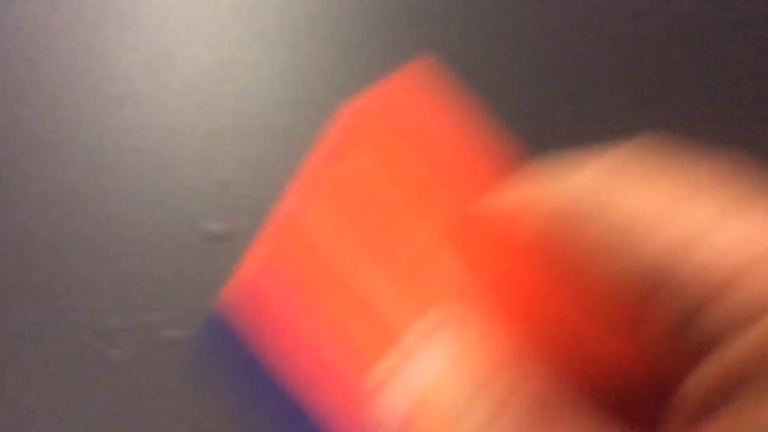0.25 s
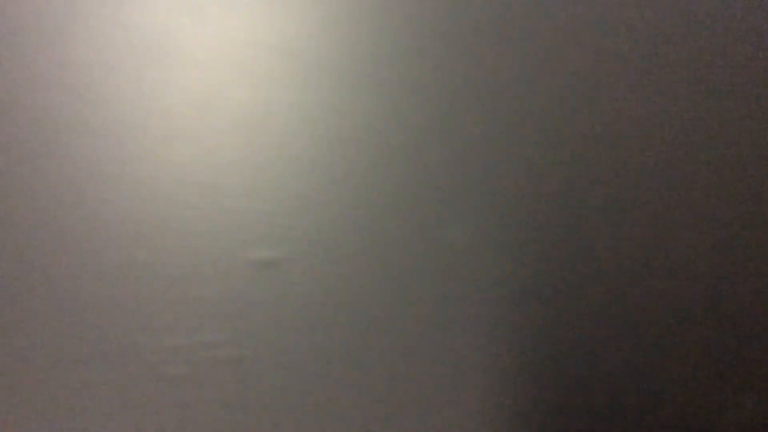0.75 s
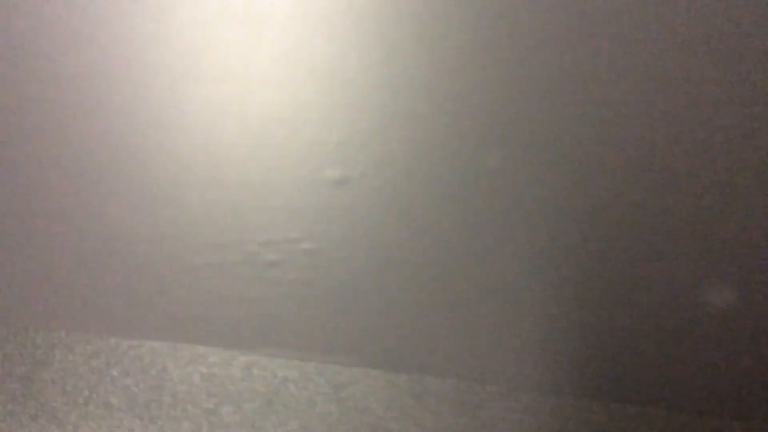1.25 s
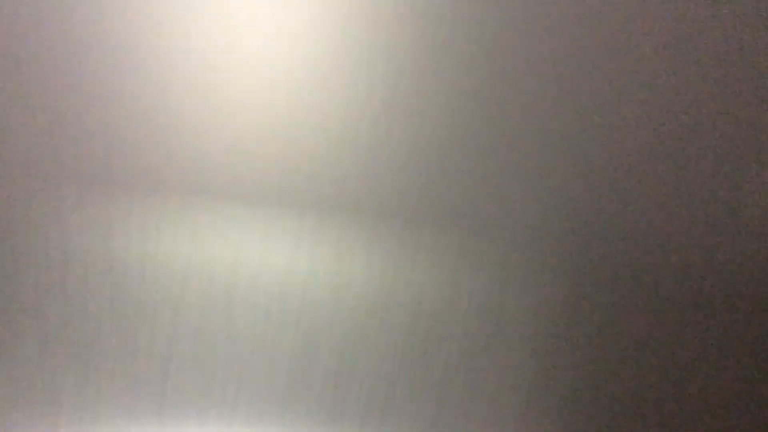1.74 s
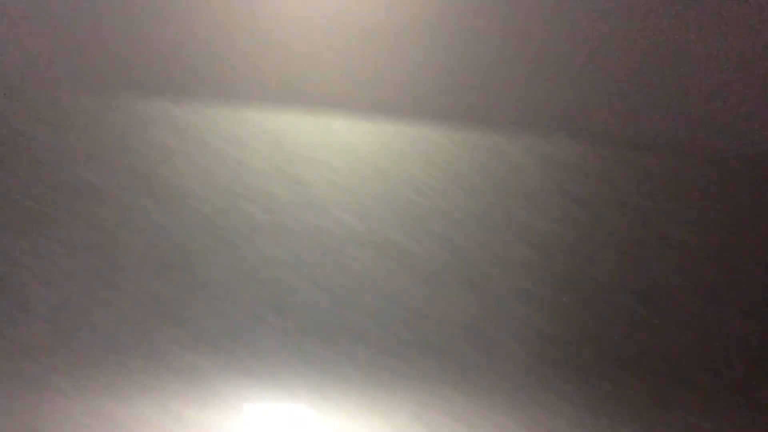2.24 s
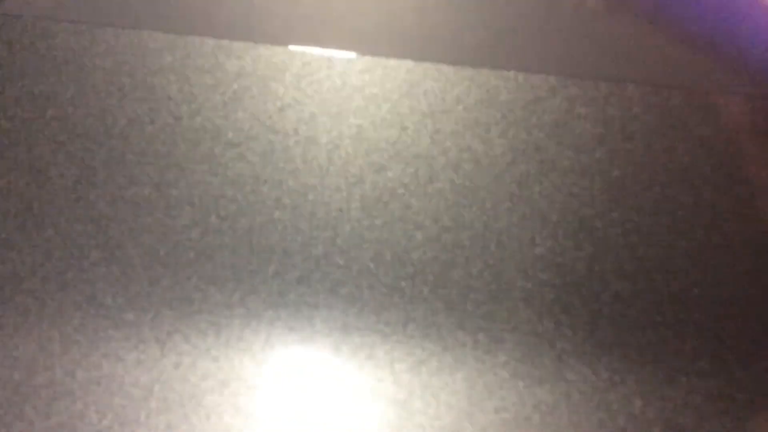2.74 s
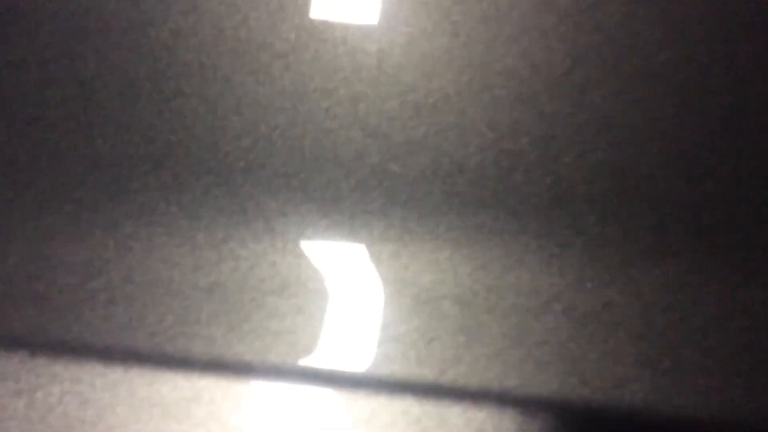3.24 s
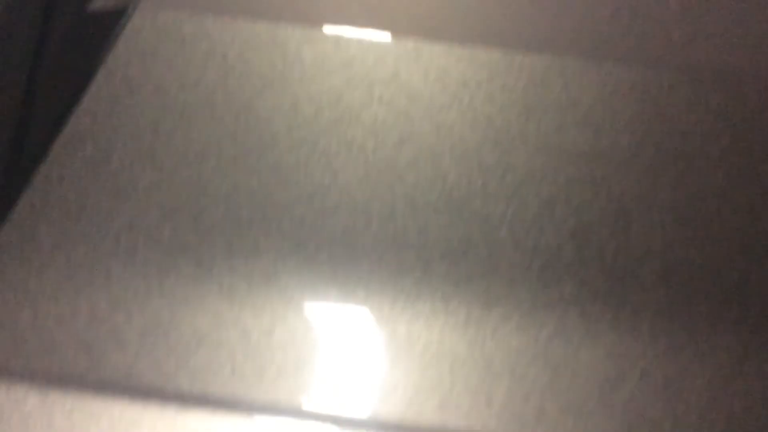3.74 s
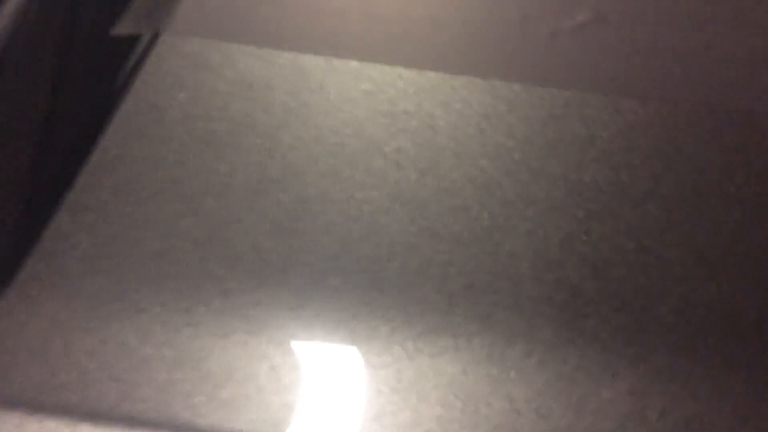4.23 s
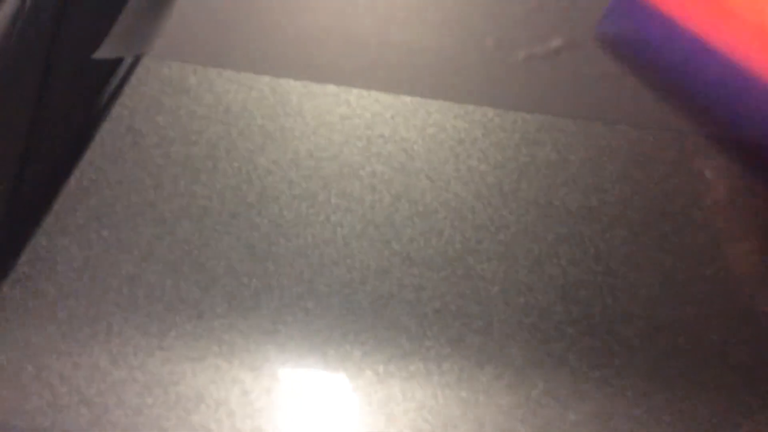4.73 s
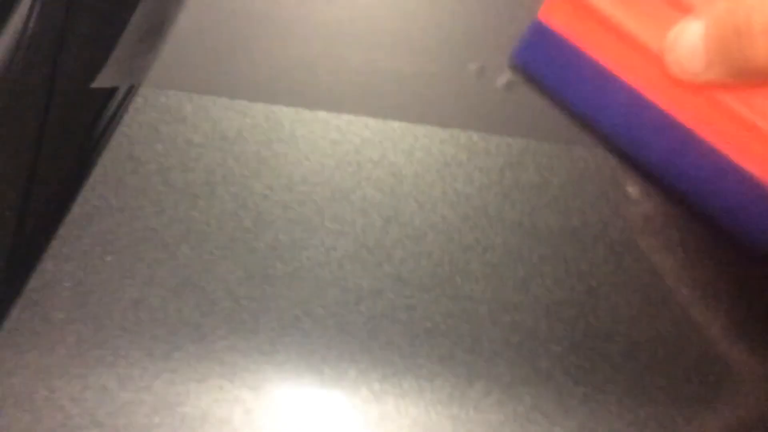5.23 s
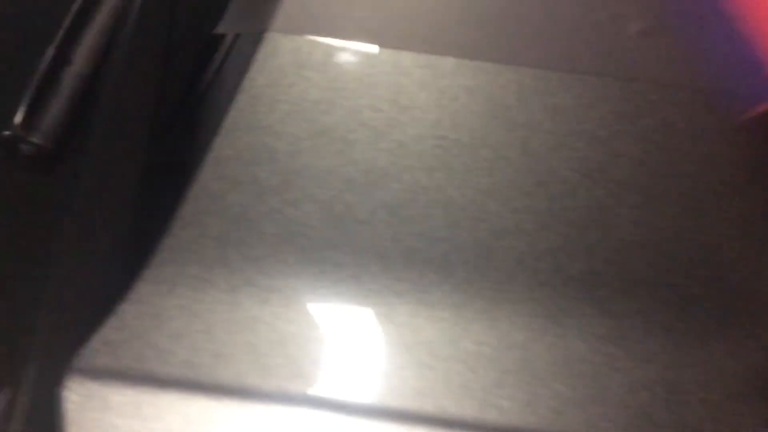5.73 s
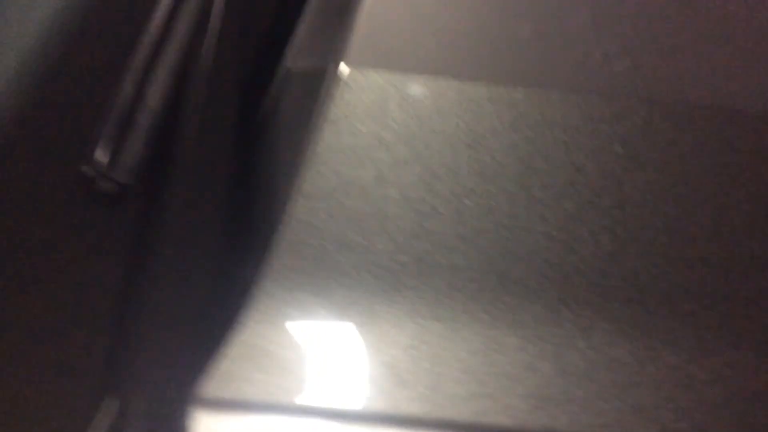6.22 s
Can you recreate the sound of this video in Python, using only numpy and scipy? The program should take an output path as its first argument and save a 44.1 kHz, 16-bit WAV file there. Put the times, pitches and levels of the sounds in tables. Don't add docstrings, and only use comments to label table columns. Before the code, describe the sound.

Close mono sound in a quiet, hard garage with faint hiss. A bright plastic scrape over vinyl film is already under way and cuts off at 0.3 s. Until 2.5 s only handling is heard: low rumble, soft bumps around 0.8-1.3 s, faint finger and cloth rubs, a loud case knock at 1.6 s, small ticks and a slight palm creak near 2.3 s. At 2.5 s the squeegee catches lightly, then scrapes until 2.8 s, ending in sharp snaps. Further strokes start at about 3.2, 3.9, 4.5, 5.0, 5.6 and 6.15 s, each a hollow sheet-metal thump with shudder, then a quarter- to third-second hissy scrape swelling in speed and brightness before lifting abruptly. Single pops come near 3.5, 3.57 and 4.1 s; low grip bumps at 3.4 and 5.2 s. The room rings lightly between strokes. Small crackles follow the last stroke at 6.4 s.

```python
import sys
import numpy as np
from scipy import signal
from scipy.fft import rfft, irfft, next_fast_len
from scipy.io import wavfile
from scipy.ndimage import uniform_filter1d, map_coordinates

SR = 44100
rng = np.random.default_rng(int(sys.argv[2]) if len(sys.argv) > 2 else 0)


def natural_amplitude(level_db):
    exponent = np.asarray(level_db, float) / 20
    return 10 ** exponent


def pcm_store(signal):
    levels = np.round(np.clip(np.atleast_2d(signal), -1, 1) * 32767)
    wavfile.write(sys.argv[1], SR, levels.astype(np.int16).T)


N = 285768
TIME = np.arange(N) / SR
STEPS = TIME[::32]

# touch_s, lift_s, full_scrape_db, speed_up_s, start_below_full_db
STROKES = [
    (0.001, 0.313, -37, 0.21, 33),
    (2.499, 2.57, -60.5, .01, 7),
    (2.563, 2.812, -33.5, 0.11, 33),
    (3.197, 3.562, -34, .16, 21),
    (3.58, 3.648, -49.5, .01, 1),
    (3.879, 4.133, -33, 0.13, 18),
    (4.485, 4.713, -34, 0.09, 19),
    (5.024, 5.248, -33, .12, 23),
    (5.579, 5.811, -35.5, 0.093, 19.5),
    (6.153, 6.416, -33.5, 0.15, 23),
]
# fizz_over_scrape_db, drag_db, swell_db_per_s, fizz_speed_up_s, flex_over_scrape_db
LEAN = [(-12, -51, 14, 0.25, -24.5), (-13, -60, -1.5, 0.0092, -14), (-8, -54.5, 4.5, 0.19, -15.5),
        (-9.5, -56, 9, 0.25, -15), (-5, -76, -63, .01, -19.5), (-9.5, -54.5, 6, 0.14, -17.5),
        (-8, -56.5, 2, .14, -17), (-9, -56, 11, 0.15, -16), (-9.5, -57, 4, 0.11, -17),
        (-11.5, -55.5, 9.5, 0.15, -17.5)]
# pitch_hz, width_hz, level_db
SCRAPE_MODES = [(2590, 630, -14), (4510, 553, 0), (6330, 720, 1), (8100, 1150, -7.5)]
# pitch_hz, width_hz, level_db
EDGE = [(9070, 1800, 5.5), (12560, 630, -1), (14600, 1370, -3)]
# pitch_hz, width_hz, level_db
FLEX = [(2778, 1190, 0)]
# pitch_hz, level_db_per_hz
DRAG = [(88, -42), (150, -12), (274, -11), (481, -13.5), (845, -14.5), (924, -15), (1220, -8.5),
        (1780, -10), (3200, -8), (4160, -21), (7040, -120)]


def scrape():
    _, _, full_db, rise_s, start_db = np.transpose(STROKES)[..., None]
    fizz_db, drag_db, _, fizz_s, flex_db = np.transpose(LEAN)[..., None]
    slips = patchy(grit(spread_db=-0.5), depth_db=2.5)
    slow_slips = grit(spread_db=2.0)

    main = stroke(full_db - 1.5, start_db, rise_s, lift_db=3.5) * unit(ring(slips, SCRAPE_MODES))
    early_db = full_db - 7 + 0.4 * (-13.5 - flex_db)
    early = stroke(early_db, 0.48 * start_db, 0.5 * rise_s, lift_db=3.5)
    early = early * unit(ring(slow_slips, [(2650, 640, -12), (4550, 790, 1)]))
    flex = stroke(full_db + flex_db, 0.34 * start_db, 0.23 * rise_s, lift_db=3.5)
    flex = flex * unit(ring(rng.standard_normal(N), FLEX, order=2))

    fizz = stroke(full_db + fizz_db, 24, fizz_s, lift_db=5.5)
    fizz = fizz * unit(ring(ring(slips, EDGE), [(13900, 3900, 0)]))
    drag = stroke(drag_db, 8.5, 0.064, lift_db=6, stays_s=0.023)
    drag = drag * natural_amplitude(4.0 + 1.37 * wobble(55)) * hiss(DRAG)
    return natural_amplitude(0.07) * (main + early + flex) + natural_amplitude(4.5) * fizz + drag


def stroke(full_db, start_db, rise_s, lift_db, stays_s=0):
    touch, lift = np.transpose(STROKES)[:2, :, None]
    u = np.clip((STEPS - touch) / rise_s, 0, 1)
    speed = u * u * (3 - 2 * u)
    swell_db = np.transpose(LEAN)[2, :, None] * np.clip(STEPS - lift, touch - lift, 0)
    off_db = lift_db * (np.maximum(STEPS - lift - stays_s, 0) / 0.021) ** 1.23
    before_db = 4000 * np.maximum(touch - STEPS, 0)
    return smooth(full_db - start_db * (1 - speed) + swell_db - off_db - before_db)


def grit(spread_db):
    clumps_db = 0.17 * wobble(250) + 1.15 * wobble(40)
    return rng.standard_normal(N) * natural_amplitude(spread_db * rng.standard_normal(N) + clumps_db)


def patchy(x, depth_db):
    z = signal.stft(x, nperseg=256)[2]
    field = uniform_filter1d(rng.standard_normal(z.shape), size=4, axis=0)
    field = uniform_filter1d(field, size=10, axis=1)
    return signal.istft(z * natural_amplitude(depth_db * unit(field)), nperseg=256)[1][:N]


# hit_s, peak_db, hardness_db
LANDINGS = [(2.498, -23, -12.5), (2.527, -26.5, -25), (3.192, -26, -12), (3.201, -17.5, -10.5),
            (3.2142, -25, -24), (3.875, -32.5, -12.5), (3.882, -17, -19), (4.478, -36.5, -3),
            (4.488, -16, -22), (5.0236, -17.5, -15), (5.0267, -24.5, -20), (5.042, -27.5, -20),
            (5.578, -15.5, -7.5), (6.158, -21, -22)]
# pitch_hz, width_hz, level_db
PANEL = [(190, 45.3, -1), (290.6, 38, 4), (433, 134, -2.5), (465, 38.5, -1.5), (586, 56, -15.5),
         (760, 8, -37)]
# pitch_hz, width_hz, level_db
STIFF = [(973, 79, 6.5), (1303, 116, 7.5), (1630, 290, -19), (2140, 200, -24)]


def landings():
    s, db, hard_db = np.transpose(LANDINGS)
    soft_push = -np.hanning(int(0.0015 * SR) + 3)
    hard_push = np.hanning(int(0.00046 * SR) + 3)
    low = struck(s, db, soft_push, PANEL)
    high = struck(s + 0.00253, db + hard_db - 0.6, hard_push, STIFF)

    since_s = TIME - np.r_[0, s][np.searchsorted(s, TIME)]
    shake = rng.standard_normal(N) * natural_amplitude(2.26 * wobble(70))
    chatter = 0
    for hz, width, mode_db in PANEL:
        drive_db = mode_db + 4.0 - 120 * np.log2(hz / 290) * np.minimum(since_s, 0.15)
        chatter += natural_amplitude(drive_db) * unit(ring(shake, [(hz, 3.02 * width, 0)], order=2))
    return low + high + natural_amplitude(-7.0) * shudder() * chatter


def struck(times, dbs, pulse, modes):
    blows = np.zeros(N)
    np.add.at(blows, np.round(np.asarray(times) * SR).astype(int), natural_amplitude(dbs))
    answer = ring(np.pad(pulse, (0, N - len(pulse))), modes)[:SR // 2]
    return signal.fftconvolve(blows, answer / np.abs(answer).max())[:N]


# start_s, level_db, fade_db_per_s
SHUDDERS = [(.005, -54, 71), (2.511, -32.5, 92), (3.207, -25, 110), (3.891, -29, 98), (4.08, -55, 122),
            (4.496, -27.5, 116), (5.036, -27.5, 122), (5.155, -44, 147), (5.593, -25.5, 119),
            (5.76, -53, 155), (6.168, -36.5, 86)]


def shudder():
    s, db, fade_db = np.transpose(SHUDDERS)[..., None]
    t = np.maximum(STEPS - s, 0)
    jolt_db = 11 * (1 - np.exp(-t / 0.025))
    return smooth(db - jolt_db - fade_db * t - 2401 * np.maximum(s - STEPS, 0))


# snap_s, peak_db, top_db
SNAPS = [(2.7359, -21.6, 1.0), (2.7389, -17.7, 0.6), (2.7403, -20.3, 4.9), (2.7534, -27.3, 4.4),
         (2.7753, -16.8, -6.3), (2.7807, -21.5, 7.7), (2.7849, -11.7, 3.6), (2.7871, -3.5, -1.4),
         (2.7904, -10.2, 0.9), (2.8295, -31, 2), (2.8378, -29, 6), (2.855, -33, 8), (3.5253, -9.0, 4.4),
         (3.5692, -12.5, -1.4), (4.1102, -10.5, 7), (6.4016, -25.2, 0.4), (6.4111, -19.9, -4.9),
         (6.4237, -35.3, 6.7), (6.4408, -34.0, 1.6), (6.4459, -33.6, 7.1)]


def snaps():
    return natural_amplitude(0.2) * cracks(SNAPS, SCRAPE_MODES, tail=0.052, t60=0.018)


# pitch_hz, width_hz, level_db
BURST = [(10260, 6300, 6), (14600, 5700, 2)]


def cracks(rows, modes, tail, t60):
    t, body, top = TIME[1:300], np.zeros(N), np.zeros(N)
    for s, db, top_db in rows:
        crack = np.r_[1, tail * natural_amplitude(-60 * t / t60) * rng.standard_normal(len(t))]
        body[round(s * SR):][:len(crack)] += natural_amplitude(db) * crack
        top[round(s * SR):][:len(crack)] += natural_amplitude(db + top_db) * crack
    spike = TIME == 0
    body = ring(body, modes) / np.abs(ring(spike, modes)).max()
    top = ring(-top, BURST) / np.abs(ring(spike, BURST)).max()
    return body + top


# bump_s, peak_db, pitch_hz, flick_db
PUSHES = [(.0055, -33.5, 210, -25), (0.0144, -38, 190, -27), (.021, -36, 168, -25), (.028, -38, 150, -25),
          (0.887, -30.5, 154, -20), (1.0803, -41.5, 294, 4), (1.152, -25, 160, -17),
          (1.2049, -38.5, 210, -10), (1.276, -34, 198, -8), (1.5423, -53, 156, -12), (1.621, -47, 190, 4.5),
          (1.748, -42, 97, -36), (1.798, -31.5, 147, -29), (1.8708, -37.5, 171, -15),
          (1.9063, -44, 114, -26), (1.964, -50, 217, -17), (2.1694, -42, 184, -28), (2.2834, -35, 142, 0),
          (2.302, -34.5, 186, -16)]
# bump_s, peak_db, pitch_hz, flick_db
PULLS = [(0.0405, -36, 85, -25), (0.7698, -44, 105, -21.4), (1.087, -40, 52, -40), (1.105, -35, 50, -38),
         (1.123, -48, 54.7, -40), (1.233, -46.3, 147, -8), (1.2576, -37.5, 129, -13),
         (1.4844, -55, 117, -5), (2.077, -41, 135, -30), (2.586, -29, 173, -21), (2.689, -31.5, 204, -17),
         (3.417, -20.5, 203, -5.5), (3.4882, -37.5, 180, -2), (5.215, -19, 156, -10),
         (5.253, -32.5, 185, -18.3), (6.1548, -18.5, 136, -35)]
# time_s, level_db
SWAY = [(0, -58), (.6, -55.5), (1.0, -54), (1.33, -59.5), (1.45, -51), (2.4, -52), (2.75, -54.5),
        (3.3, -58), (4.2, -54.5), (5, -56), (6.48, -54)]
# start_s, end_s, level_db
LURCHES = [
    (0, .04, -46.5),
    (1.09, 1.16, -44),
    (1.88, 1.9, -45.5),
    (2.25, 2.27, -58),
    (2.5, 2.52, -48),
    (3.43, 3.46, -46.5),
    (3.87, 3.89, -49.5),
    (4.47, 4.5, -48.5),
    (5.21, 5.23, -56),
    (6.14, 6.16, -46.5),
]
# start_s, end_s, level_db
CREAK = [
    (1.21, 1.285, -58),
    (1.49, 1.55, -65.5),
    (1.85, 1.98, -82),
    (2.27, 2.31, -54.5),
]
# pitch_hz, level_db_per_hz
RUMBLE = [(8.8, -84), (15, -17.5), (32, 5), (49, 5.5), (80, 4), (179, -14), (300, -26), (390, -27),
          (660, -120)]


def handling():
    lumps_db = 1.8 * wobble(12)
    sway = natural_amplitude(np.interp(TIME, *np.transpose(SWAY)))
    unsteady = np.maximum(sway, held(LURCHES, rise_db=128, fall_db=137))
    out = unsteady * natural_amplitude(lumps_db + 0.66) * hiss(RUMBLE)
    palm = [(295, 230, 0)]
    out += held(CREAK, rise_db=950, fall_db=906) * unit(ring(grit(spread_db=-2.5), palm, order=3))
    for sign, bumps in [(1, PUSHES), (-1, PULLS)]:
        for s, db, hz, flick_db in bumps:
            near = np.flatnonzero(np.abs(TIME - s) < 2 / hz)
            t = TIME[near] - s
            flick = natural_amplitude(flick_db - 5.5) * wave(t * 520, 0.66)
            out[near] += sign * natural_amplitude(db - 0.75) * (wave(t * hz, 0.5) + flick)
    return out


def wave(cycles, width):
    return np.exp(-(cycles / width) ** 2) * np.cos(2 * np.pi * cycles)


# tick_s, peak_db, top_db
TICKS = [
    (.781, -45.5, -1),
    (1.208, -46.5, 3),
    (1.6135, -57, -28),
    (1.6199, -21, -36),
    (1.6217, -36, -30),
    (1.648, -55, -15),
    (1.839, -41, -2),
    (1.973, -59, -14),
    (2.04, -57, -14),
]
# tap_s, peak_db, top_db
NAIL = [
    (1.0768, -37.5, -32),
]
# pitch_hz, width_hz, level_db
CASE = [(1990, 1500, -18), (3020, 380, -2), (4660, 430, 2.5), (6930, 930, -8), (9400, 900, -18)]
# pitch_hz, width_hz, level_db
DULL = [(1070, 230, -8), (2080, 160, -3), (3100, 120, 7), (4750, 380, -4), (7500, 1800, -26)]


def ticks():
    case = ring(cracks(TICKS, CASE, tail=0.31, t60=0.015), [(4770, 4800, 0)])
    return natural_amplitude(-5.7) * case + cracks(NAIL, DULL, tail=0.29, t60=0.0073)


# start_s, end_s, level_db
RUBS = [
    (.58, .6, -69.5),
    (.85, .88, -71.5),
    (1.25, 1.6, -72.5),
    (1.86, 1.89, -72),
    (2.43, 2.47, -71),
]
# start_s, end_s, level_db
FLICKS = [
    (1.083, 1.092, -54.5),
    (1.105, 1.108, -59.5),
    (1.611, 1.614, -59),
]
# start_s, end_s, level_db
SLEEVE = [
    (1.33, 1.45, -81),
]
# start_s, end_s, level_db
SQUEAK = [
    (2.04, 2.07, -80.5),
]
# pitch_hz, width_hz, level_db
SKIN = [(2610, 77, 2), (3780, 110, 2)]


def rubs():
    cloth = patchy(grit(spread_db=4.0), depth_db=3.5)
    touch = held(RUBS, rise_db=86, fall_db=95) + held(FLICKS, rise_db=1600, fall_db=802)
    finger = touch * natural_amplitude(2.4 * wobble(31.8)) * unit(ring(cloth, CASE))
    sleeve = held(SLEEVE, rise_db=50, fall_db=60) * unit(ring(cloth, [(9250, 3300, 0)], order=2))
    squeak = held(SQUEAK, rise_db=150, fall_db=40) * unit(ring(cloth, SKIN, order=2))
    return finger + sleeve + squeak


# pitch_hz, t60_s
GARAGE = [(200, 0.68), (1500, 1.48), (4500, 1.33), (8000, 0.95), (13000, 0.46)]


def garage(x):
    out, hop = np.zeros(N + 2 * SR), SR * 3 // 10
    for i in range(0, N, hop):
        hz, t, z = signal.stft(rng.standard_normal(SR), SR, nperseg=256)
        decay_db = -60 * t / along(GARAGE, hz)[:, None]
        dull_db = -0.64 * np.log2(1 + hz / 5000)[:, None]
        tail = signal.istft(z * natural_amplitude(decay_db + dull_db), SR, nperseg=256)[1]
        delayed = np.pad(tail, (500, 0))
        wet = signal.fftconvolve(x[i:i + hop], delayed / np.linalg.norm(tail))
        out[i:i + len(wet)] += wet
    return out[:N]


# pitch_hz, level_db_per_hz
HISS = [(88, -11.5), (150, -33.5), (201, -10), (279, -17.5), (410, -11.5), (508, -17), (2010, -29.5),
        (3190, -31), (3650, -25), (5380, -34), (8900, -31), (15300, -33.5)]


def background():
    return natural_amplitude(-71) * hiss(HISS)


def hiss(spectrum):
    return unit(filtered(rng.standard_normal(N), lambda hz: natural_amplitude(along(spectrum, hz))))


def held(rows, rise_db, fall_db):
    start, end, db = np.transpose(rows)[..., None]
    return smooth(db - rise_db * np.maximum(start - STEPS, 0) - fall_db * np.maximum(STEPS - end, 0))


def smooth(db):
    return natural_amplitude(np.interp(TIME, STEPS, np.max(db, axis=0)))


def wobble(rate):
    return map_coordinates(rng.standard_normal(int(N * rate / SR) + 4), [TIME * rate])


def ring(x, modes, order=1):
    def response(f):
        total = 0
        for k, (hz, width, db) in enumerate(modes):
            mode = 1j * f * width / (hz * hz - f * f + 1j * f * width)
            total = total + (-1) ** k * natural_amplitude(db) * mode
        return total ** order
    return filtered(x, response)


def filtered(x, response):
    m = next_fast_len(N + SR // 2)
    return irfft(rfft(x, m) * response(np.fft.rfftfreq(m, 1 / SR)), m)[:N]


def along(points, hz):
    f, v = np.transpose(points)
    return np.interp(np.log(hz + 1), np.log(f + 1), v)


def unit(x):
    return x / np.sqrt(np.mean(x ** 2) + 1e-20)


def scene():
    slide, panel, pops = scrape(), landings(), snaps()
    room = garage(natural_amplitude(-14) * slide + natural_amplitude(-18) * pops + natural_amplitude(-14) * panel)
    mono = slide + pops + panel + room + handling() + rubs() + ticks() + background()
    return np.array([mono, mono])


# pitch_hz, level_db
PORT = [(20, 0), (15270, 0), (15410, -60), (16400, -90)]


def microphone(x):
    return filtered(x, lambda hz: natural_amplitude(along(PORT, hz)))


def band_limit(x):
    return signal.sosfilt(signal.butter(12, 16450, fs=SR, output="sos"), x)


def record(dry):
    heard = np.tile(microphone(dry[0]), (len(dry), 1))
    return band_limit(heard)


dry = scene()
out = record(dry)
pcm_store(out)
```